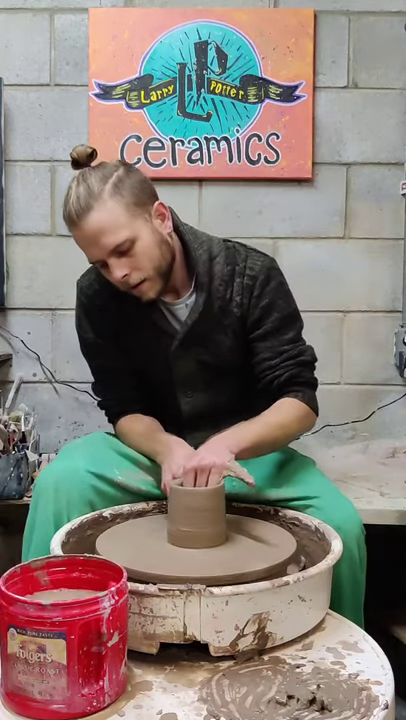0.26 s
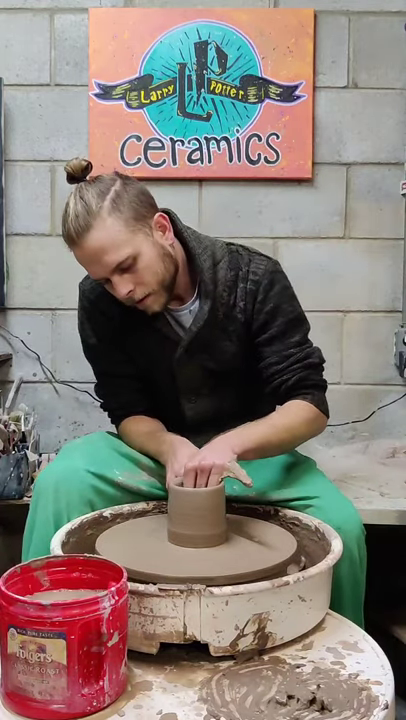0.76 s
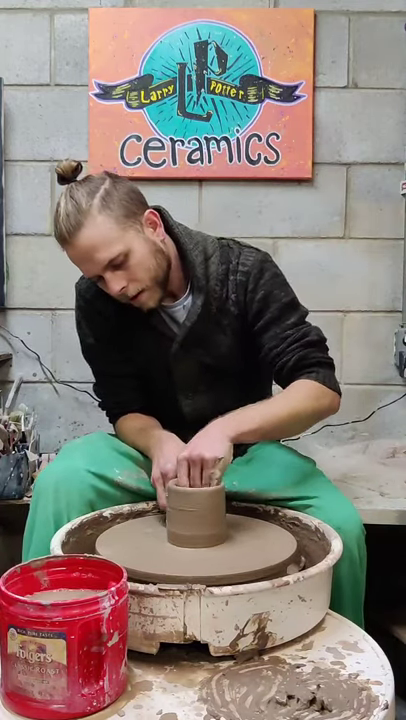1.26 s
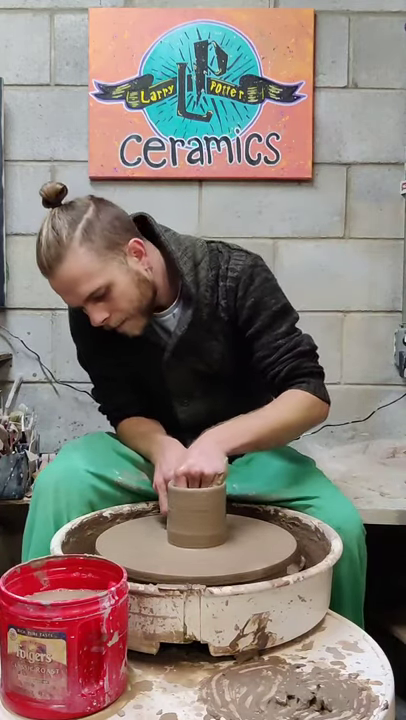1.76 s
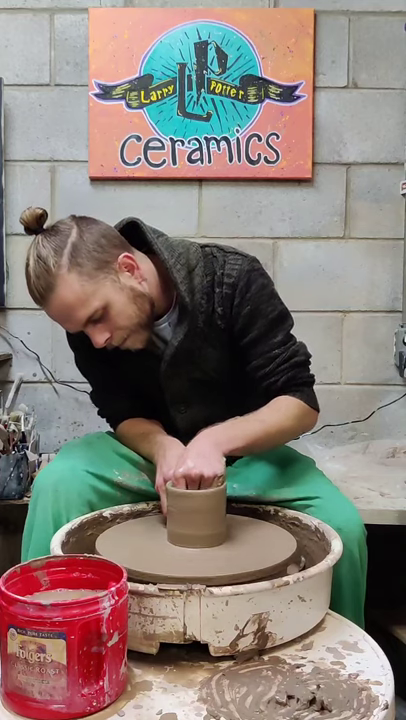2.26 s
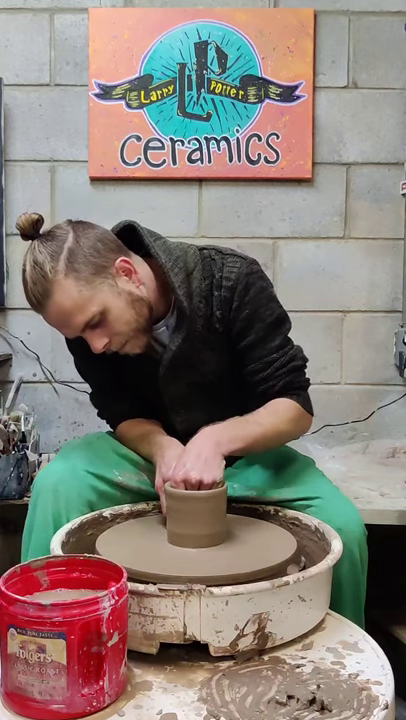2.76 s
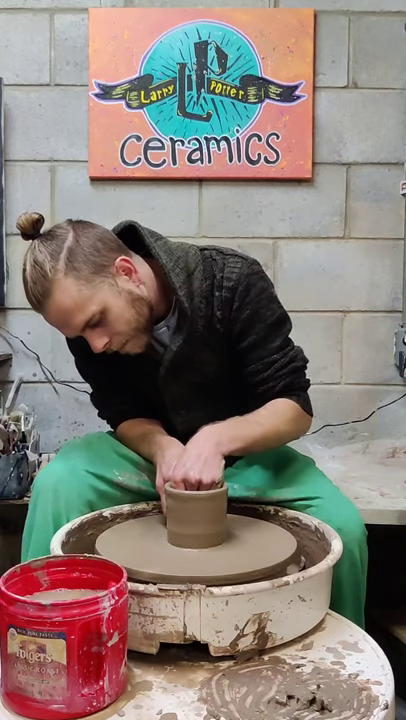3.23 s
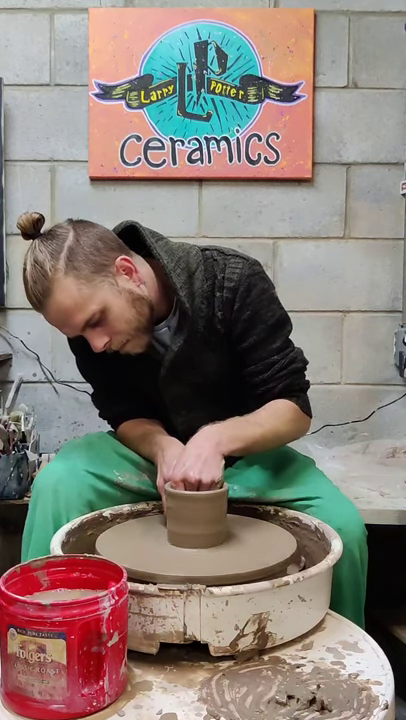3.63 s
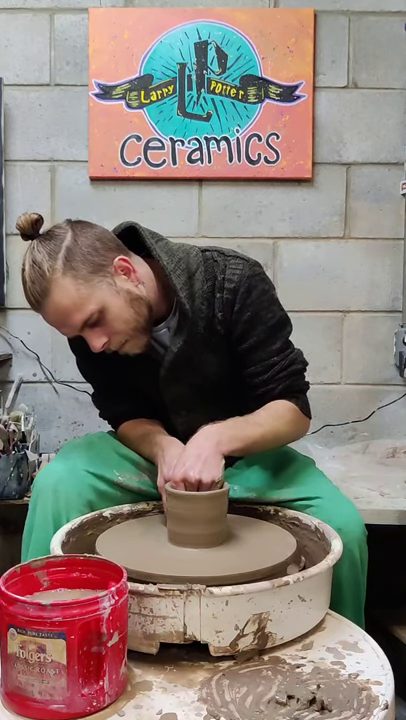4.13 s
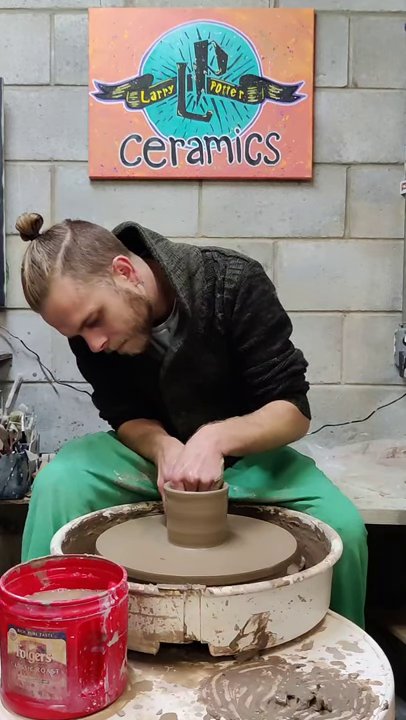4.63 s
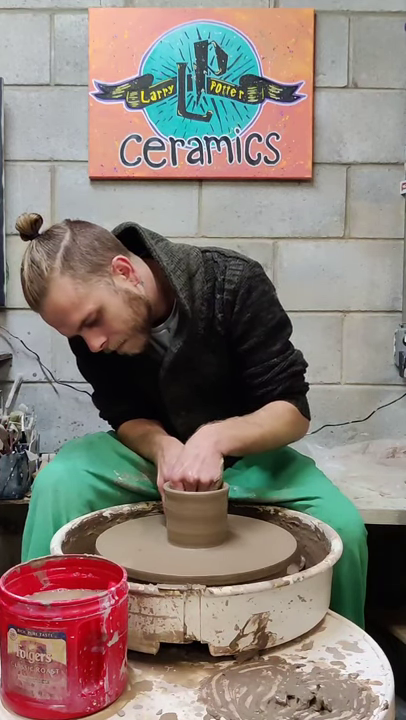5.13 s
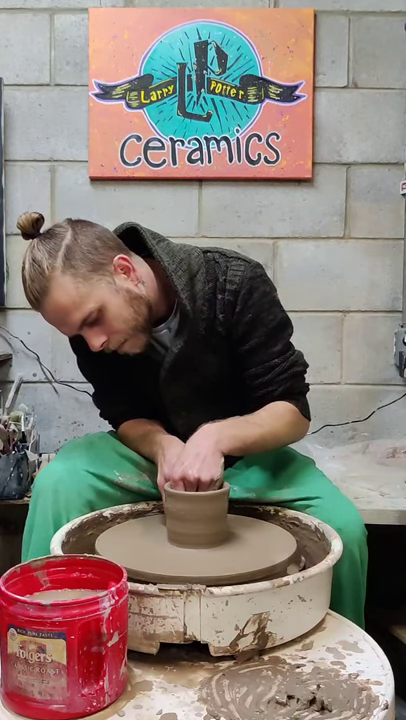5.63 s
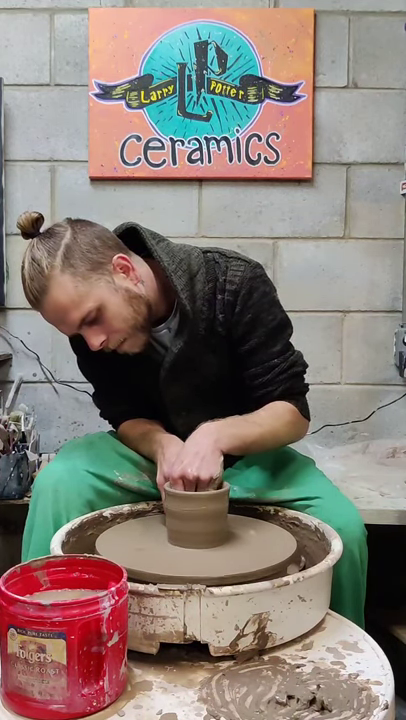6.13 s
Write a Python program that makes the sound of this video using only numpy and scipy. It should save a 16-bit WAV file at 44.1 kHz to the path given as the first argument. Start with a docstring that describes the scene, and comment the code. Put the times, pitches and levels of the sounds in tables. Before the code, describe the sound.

Steady mid-low electric hum-whine of a turning pottery wheel, heard fairly close in stereo in a small hard-walled room. The early seconds waver slightly in loudness, with a burring overtone pulsing on each wheel turn; then the tone grows a touch stronger and more even as the hands press and the drive rubs harder. Low frame rumble, faint airy hiss and tiny wet finger slips stay in the background, and the motor never stops.

```python
"""The whine of an electric potter's wheel at nearly steady speed, on two microphones in a small studio.
The motor whines on its sixteen slots; over it a rough buzz of shaft harmonics swells with every turn
of the wheel, less as the clay evens out. The drive rubs harder as the hands bear down on the clay.
Fluttering tones and resonant noise make the frame ring and rumble, high shaft multiples make the brushes sing,
and shaped noise makes the soft hiss, the walls' scatter and the wet fingers that rub and slip on the clay."""
import sys
import numpy as np
from scipy import signal
from scipy.fft import rfft, irfft
from scipy.io import wavfile

SR = 44100
rng = np.random.default_rng(int(sys.argv[2]) if len(sys.argv) > 2 else 0)


def dump(signal):
    """Clip the signal to [-1, 1] and save it as 16-bit WAV at the path in sys.argv[1]."""
    limited = np.clip(np.atleast_2d(signal).T, -1, 1)
    pcm = np.round(limited * 32767).astype(np.int16)
    wavfile.write(sys.argv[1], SR, pcm)


N = 281780
TIME, BINS = np.arange(N) / SR, np.arange(N // 2 + 1) * SR / N   # seconds, Hz
SLOTS = 16   # armature slots, so whine cycles per shaft turn
# Table levels are those at the source, before the gains that a function or scene() applies.


def from_db(db):
    """Decibels to gain."""
    return 10 ** (np.asarray(db) / 20)


def in_time(rows):
    """Each column of a curve at every sample."""
    seconds, *columns = np.transpose(rows)
    return [np.interp(TIME, seconds, column) for column in columns]


def over_bins(rows):
    """Each column of a spectrum at every frequency bin, interpolated over log frequency."""
    hz, *columns = np.transpose(rows)
    return [np.interp(np.log(BINS + 1), np.log(hz), column) for column in columns]


def band(rows):
    """Gain of a noise spectrum that falls steeply around its ends."""
    hz = BINS + 1
    lowest_hz, highest_hz = rows[0][0], rows[-1][0]
    below = (lowest_hz / hz) ** 24
    above = (hz / highest_hz / 1.1) ** 24
    edges = 1 / np.sqrt((1 + below) * (1 + above))
    return from_db(over_bins(rows)[0]) * edges


def resonance(hz, width_hz):
    """Gain of a steep-sided resonance that passes unit power."""
    shape = 1 / (1 + ((BINS - hz) / width_hz) ** 2)
    return shape / np.sqrt(np.sum(shape ** 2) * SR / N)


def noise(gain):
    """Noise whose amplitude per root Hz is the given gain."""
    white = rng.standard_normal(N)
    return irfft(rfft(white) * gain, N) * np.sqrt(SR / 2)


def diffuse(gain):
    """Unrelated noise at the two microphones."""
    return np.array([noise(gain), noise(gain)])


def pan(balance_db):
    """Left and right gains of constant power for a left-right difference in dB."""
    pair = from_db(np.array([balance_db, -balance_db]).reshape(2, -1) / 2)
    return pair / np.sqrt(np.mean(pair ** 2, axis=0))


def drift(rate):
    """Slow chance, changing about rate times a second; spread 1."""
    slow = noise(1 / (1 + (BINS / rate) ** 4))
    return slow / np.std(slow)


def cycle(period_s, crest_s):
    """A steady swing between -1 and 1."""
    return np.cos(2 * np.pi * (TIME - crest_s) / period_s)


def flutter_tone(cycles, unsteady):
    """A tone that flutters in strength and phase; rms about 1."""
    knots = np.arange(0, TIME[-1] + 1, .1)   # a new chance value every 0.1 s
    chances = rng.standard_normal((2, len(knots)))
    along, across = (unsteady * np.interp(TIME, knots, chance) for chance in chances)
    angle = 2 * np.pi * cycles
    tone = (1 + along) * np.sin(angle) + across * np.cos(angle)
    return tone * np.sqrt(2 / (1 + unsteady ** 2))


# Noise of the rumbling frame. Each row: frequency in Hz, level in dB per Hz.
RUMBLE_SPECTRUM = [(8, -83.5), (25, -69.5), (52, -82), (85, -82), (115, -85.5), (140, -84), (185, -91),
                   (230, -85.5), (265, -97), (290, -84.5), (335, -91.0), (420, -81.5), (510, -90),
                   (620, -96.5)]
# Noise of the rubbing drive. Each row: frequency in Hz, level in dB per Hz.
DRIVE_RUB_SPECTRUM = [(520, -90), (610, -92), (680, -88.5), (740, -86.5), (785, -84), (860, -79),
                      (915, -93.5), (975, -86), (1060, -89), (1170, -93.5), (1300, -102.4)]


def studio():
    """Block walls scatter the rumble and rubbing, so they reach the two microphones as unrelated noise."""
    return diffuse(from_db(-10.5) * band(RUMBLE_SPECTRUM) + from_db(-13.5) * band(DRIVE_RUB_SPECTRUM))


# Skin rubbing on wet clay. Each row: frequency in Hz, level in dB per Hz.
CLAY_RUB_SPECTRUM = [(1300, -110), (1900, -109), (2500, -109), (3200, -118), (4600, -115), (7000, -124)]
# Wet fingers slipping on the clay.
# Each row: moment in seconds, length in seconds, centre in Hz, width in Hz, level at the crest in dB rms.
FINGER_SLIPS = [(.175, .012, 12000, 4000, -73), (1.432, 0.016, 4600, 260, -73),
                (2.33, .012, 12500, 4000, -74)]


def fingers(overall_gain):
    """Wet skin rubs unevenly on the clay and now and then slips with a short swish of noise."""
    unevenness = from_db(2.96 * drift(13.0))
    out = diffuse(band(CLAY_RUB_SPECTRUM)) * unevenness * overall_gain ** 1.5
    for moment_s, length_s, hz, width_hz, level_db in FINGER_SLIPS:
        envelope = np.exp(-((TIME - moment_s) / length_s) ** 2)
        out += from_db(level_db) * envelope * diffuse(resonance(hz, width_hz))
    return out


# Airy noise around the wheel. Each row: frequency in Hz, level in dB per Hz.
HISS_SPECTRUM = [(1250, -101), (1420, -103), (1600, -100), (1750, -106), (2300, -108), (2700, -107),
                 (3100, -109.5), (3800, -111), (5000, -109), (5400, -106.5), (5900, -109.1), (7600, -113),
                 (12000, -112), (15500, -113)]


def hiss(turns):
    """Airy hiss wavers and is grained by the uneven commutator; part of its low end comes straight from the wheel."""
    direct_share = .5 / (1 + (BINS / 2200) ** 4)   # share of the power
    direct = at_ports(noise(band(HISS_SPECTRUM) * np.sqrt(direct_share)))
    around = diffuse(band(HISS_SPECTRUM) * np.sqrt(1 - direct_share)) * pan(0.43)
    # the same chance pattern returns with every shaft turn
    bars = np.interp(turns, np.arange(SLOTS) / SLOTS, rng.standard_normal(SLOTS), period=1)
    grain = from_db(.62 * bars + .35 * drift(11))
    return (direct + around) * grain


# Thin whistles of the brushes.
# Each row: multiple of the shaft rate, level in dB rms, left-right balance in dB, left phase lead in radians.
BRUSH_WHISTLES = [(75.1, -96, 8, -1.9), (103.3, -95, -6, 2.5), (106.0, -91, -4, -2.7),
                  (112.0, -94, -4, -2.5), (177.0, -96, -6, -3.0), (191.9, -94, -10, 2.5),
                  (193.1, -90, -1, -2.4), (201.1, -91, 4, -1.1), (207.1, -89, 6, 0.4),
                  (209.1, -89, 5, -2.1), (210.1, -94, 8, -1.8), (211.1, -94, 2, -0.3),
                  (212.9, -94, 5, -1.5), (216.9, -89, -6, -2.4), (223.0, -95, 9, 0.0), (224.1, -96, 2, 0.2),
                  (241.1, -95, 10, -3.1), (271.9, -97, -11, 1.2)]


def brushes(turns):
    """Brushes on the commutator whistle at high multiples of the shaft rate, each at its own phase on either side."""
    out = np.zeros((2, N))
    for order, level_db, balance_db, lead in BRUSH_WHISTLES:
        left_lead = np.array([[lead / (2 * np.pi)], [0]])
        cycles = order * turns + rng.random() + left_lead
        out += from_db(level_db - 0.2) * pan(balance_db) * flutter_tone(cycles, unsteady=0.9)
    return out


# Resonances of frame and motor housing. Each row: centre in Hz, width in Hz, level in dB rms.
FRAME_RESONANCES = [(132, 6, -75), (231, 7, -77), (294, 10, -76), (466, 12, -69.5), (543, 6, -78),
                    (1515, 20, -81.5), (1960, 18, -92.5), (2295, 20, -91), (2720, 14, -90),
                    (5340, 100, -86.5)]
# Fluttering side tones of frame and splash pan. Each row: frequency in Hz, level in dB rms.
SIDE_TONES = [(82, -73), (93, -75), (143, -75), (207, -79), (234, -76), (283, -76), (927, -78), (1016, -77),
              (1059, -80), (1147, -83), (1161, -81), (1599, -88)]
HEAVE_S, FIRST_HEAVE_S, HEAVE_DB = 0.85, 0.74, 3.5   # period, first crest, swing either way
RINGS_FOLLOW, RUMBLE_FOLLOWS = 0.73, 0.87   # shares of the overall gain's swing in dB


def frame(overall_gain):
    """The running gear shakes frame and pan: side tones, narrow noisy rings and a rumble that heaves slowly."""
    tones = sum(from_db(level_db) * flutter_tone(hz * TIME + rng.random(), unsteady=0.61)
                for hz, level_db in SIDE_TONES)
    ring_power = sum((from_db(level_db) * resonance(hz, width_hz)) ** 2
                     for hz, width_hz, level_db in FRAME_RESONANCES)
    rings = noise(np.sqrt(ring_power))
    # only the rumble below about 50 Hz heaves
    deep_share = 1 / (1 + (BINS / 50) ** 4)
    heave = from_db(HEAVE_DB * cycle(HEAVE_S, FIRST_HEAVE_S))
    deep = heave * noise(band(RUMBLE_SPECTRUM) * np.sqrt(deep_share))
    rumble = deep + noise(band(RUMBLE_SPECTRUM) * np.sqrt(1 - deep_share))
    return (tones + rings) * overall_gain ** RINGS_FOLLOW + rumble * overall_gain ** RUMBLE_FOLLOWS


# the hands bear down, hold, then ease off
PRESS_START_S, PRESS_ATTACK_S, PRESS_END_S, PRESS_RELEASE_S = 2.44, 0.51, 5.15, 0.94


def pressure():
    """Pressure of the hands, 0 to 1: attack, hold, release."""
    attack = np.clip((TIME - PRESS_START_S) / PRESS_ATTACK_S, 0, 1)
    release = np.clip(1 - (TIME - PRESS_END_S) / PRESS_RELEASE_S, 0, 1)
    return attack * release


RUB_LIGHT_DB, RUB_PRESS_DB = -0.5, 2   # gain under light hands, rise under full pressure
RUB_FOLLOWS = 0.93   # share of the overall gain's swing in dB


def rubbing(turns, overall_gain):
    """The drive rubs harder once in every shaft turn, each time with its own strength, and more under the hands."""
    strength_db = 3 * np.clip(rng.standard_normal(int(turns[-1]) + 1), -2, 2)   # one for each turn
    strength = from_db(strength_db)[turns.astype(int)]
    bite = .76 + .52 * strength * np.sin(np.pi * turns) ** 4
    gain = from_db(RUB_LIGHT_DB + RUB_PRESS_DB * pressure()) * overall_gain ** RUB_FOLLOWS
    return gain * noise(band(DRIVE_RUB_SPECTRUM)) * bite


WHEEL_TURN_S, FIRST_SWELL_S, SWELL_DB = 0.851, 0.55, 4.5   # turn length, first crest, full swing either way
TRUE_AT_S, TRUING_S = 6.3, 3.8   # when the swing has died away, and how long that takes


def swell():
    """Uneven clay loads the motor once a wheel turn until it runs true; in dB."""
    unevenness = np.clip((TRUE_AT_S - TIME) / TRUING_S, 0, 1)
    return SWELL_DB * unevenness * cycle(WHEEL_TURN_S, FIRST_SWELL_S)


# Harmonics of the motor shaft. Each row: multiple of the shaft rate, level in dB rms.
SHAFT_HARMONICS = [(18, -68.7), (28, -70.5), (29, -78.8), (30, -68.8), (31, -65.0), (32, -59.2),
                   (33, -65.0), (34, -73.9), (37, -73.0), (38, -69.1), (39, -76.0), (42, -73.9),
                   (43, -77.3), (48, -70.6), (51, -89.3), (64, -87.1)]
BUZZ_DB, BUZZ_FOLLOWS = -0.36, 0.35   # mean gain, share of the overall gain's swing in dB


def buzz(turns, overall_gain):
    """Shaft harmonics; those near twice the slot tone swell most with each turn of the wheel."""
    buzz_gain = from_db(BUZZ_DB + swell()) * overall_gain ** BUZZ_FOLLOWS
    out = np.zeros(N)
    for order, level_db in SHAFT_HARMONICS:
        apart = order - 2 * SLOTS
        near = 1 / (1 + abs(apart))
        gain = buzz_gain ** near * overall_gain ** (1 - near)
        # the housing delays each harmonic differently, smearing the pulse of a turn into a rippling burr
        smear = .085 * apart ** 2   # cycles
        # overtones of the slot tone are the steadiest
        unsteady = .33 if order % SLOTS else .06
        out += from_db(level_db) * gain * flutter_tone(order * turns + smear, unsteady)
    return out


# Motor speed, sagging a little under the hands. Each row: time in seconds, slot tone in Hz.
MOTOR_SPEED = [(0, 410.1), (0.55, 409.8), (1.3, 410.5), (2.5, 409.55), (3.4, 409.5), (5.2, 408.8),
               (6.39, 409.3)]


def shaft_turns():
    """Adding up the motor's speed gives the shaft turns made so far."""
    slot_hz, = in_time(MOTOR_SPEED)
    return np.cumsum(slot_hz) / SR / SLOTS


def whine(turns, level_db):
    """The armature slots pass the magnets and give one clean tone."""
    # a sine peaks 3 dB above its rms level
    return from_db(level_db + 3) * np.sin(2 * np.pi * SLOTS * turns)


# Standing waves between the two microphones.
# Each row: frequency in Hz, left-right balance in dB, left phase lead in radians.
MICROPHONE_BALANCE = [(250, 0.5, 0), (409, -2, 0), (490, -1, 0.1), (550, -4.9, 0.2), (680, -7.6, 0.2),
                      (790, -15.2, -0.1), (860, -21, -0.6), (910, -9, 0.2), (980, -8, 2), (1080, 1.3, 2.6),
                      (1230, 4.8, 2.5), (1550, 2.5, 2.0), (1950, 1, 0), (2300, 0, 1.5), (2720, -2.5, 3.5),
                      (5300, 3, 0)]


def at_ports(x):
    """The left microphone sits near a node of the buzz; just above it the two sides swing nearly in opposition."""
    balance_db, lead = over_bins(MICROPHONE_BALANCE)
    left_lead = np.exp(1j * np.outer([1, 0], lead))
    return irfft(rfft(x) * pan(balance_db) * left_lead, N)


# Overall level of the sound, as the level of the whine. Each row: time in seconds, level in dB rms.
OVERALL_LEVEL = [(0.04, -44.5), (0.27, -48), (0.56, -45), (1.18, -47), (1.57, -46), (1.76, -48.5),
                 (2.17, -46.5), (2.22, -44), (4.82, -44), (5.1, -44), (5.87, -44.5), (6.35, -44)]
STEADY_DB = -44   # whine level from which the overall gain is counted
OVERALL_TRIM_DB, OVERALL_FOLLOWS = -0.58, 1.01   # gain at the steady level, share of the whine's swing in dB


def scene():
    """One shaft drives whine, buzz and brushes; an overall gain makes all but the finger slips move with the whine."""
    turns = shaft_turns()
    whine_db, = in_time(OVERALL_LEVEL)
    overall_gain = from_db(OVERALL_TRIM_DB + OVERALL_FOLLOWS * (whine_db - STEADY_DB))
    background = overall_gain * (studio() + hiss(turns) + brushes(turns)) + fingers(overall_gain)
    motor = whine(turns, whine_db) + buzz(turns, overall_gain)
    wheel = motor + rubbing(turns, overall_gain) + frame(overall_gain)
    return at_ports(wheel) + background


def record(dry):
    """A steep elliptic low-pass cuts the top above 15550 Hz."""
    # order 12, 0.1 dB ripple, 80 dB down beyond
    return signal.sosfilt(signal.ellip(12, .1, 80, 15550, fs=SR, output="sos"), dry)


dry = scene()
out = record(dry)
dump(out)
```